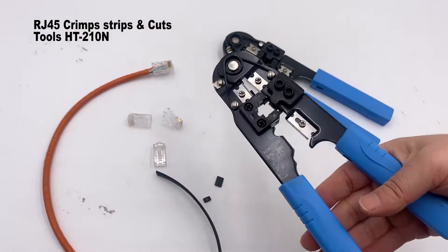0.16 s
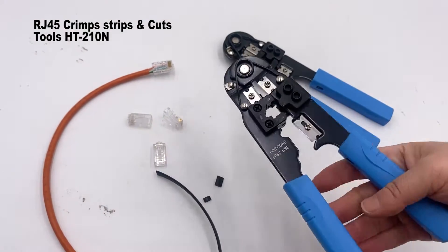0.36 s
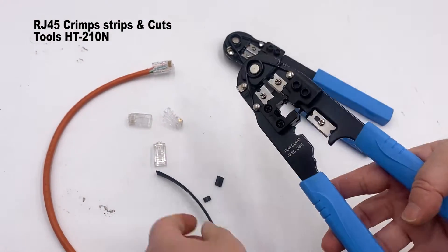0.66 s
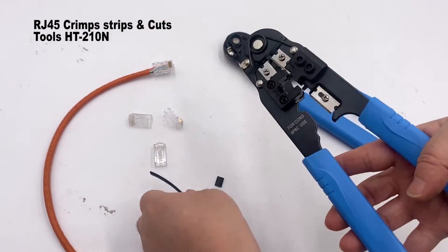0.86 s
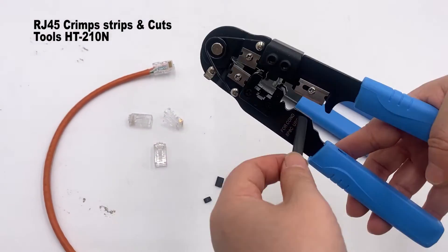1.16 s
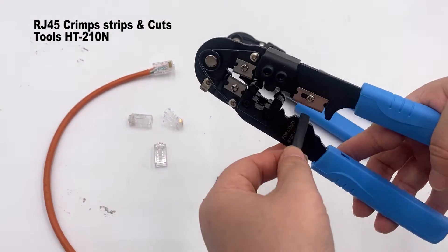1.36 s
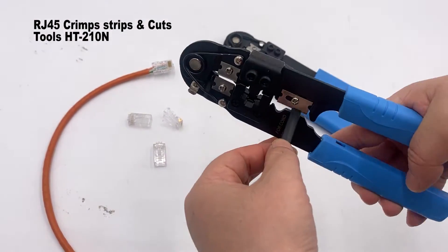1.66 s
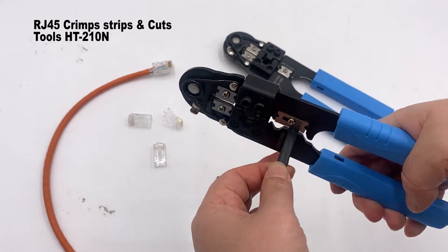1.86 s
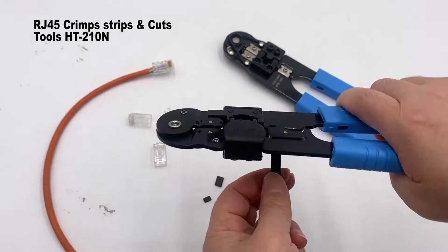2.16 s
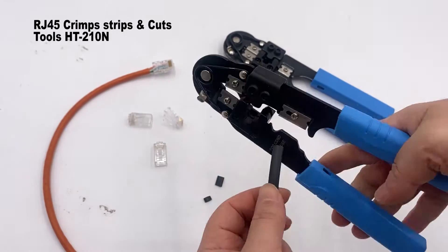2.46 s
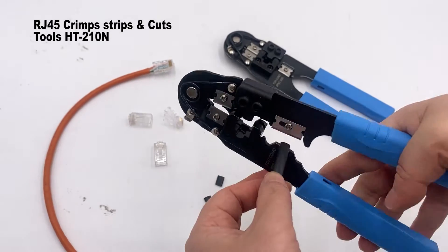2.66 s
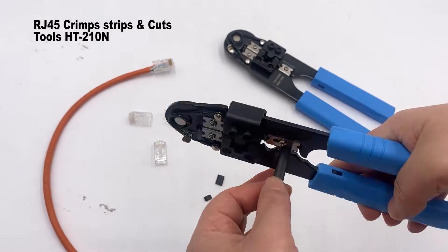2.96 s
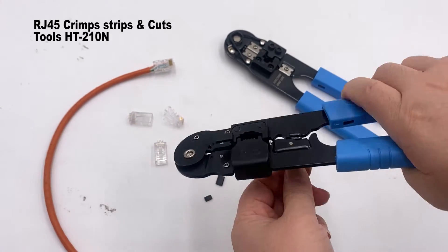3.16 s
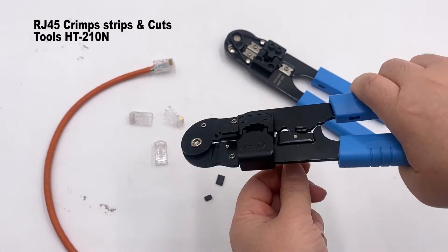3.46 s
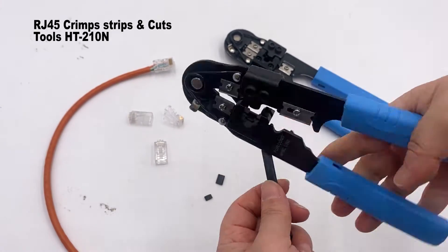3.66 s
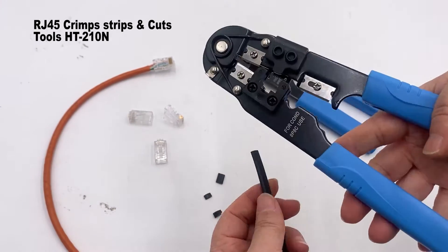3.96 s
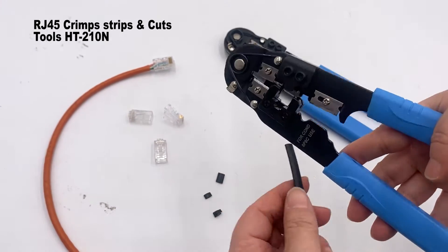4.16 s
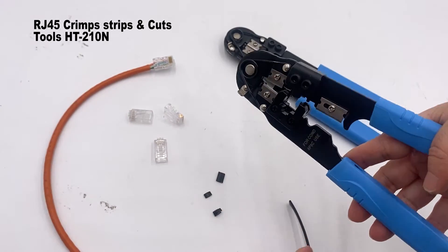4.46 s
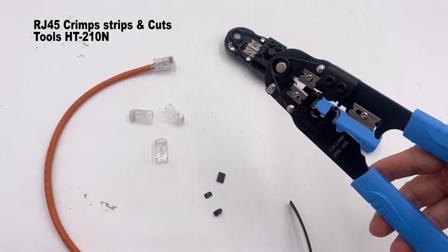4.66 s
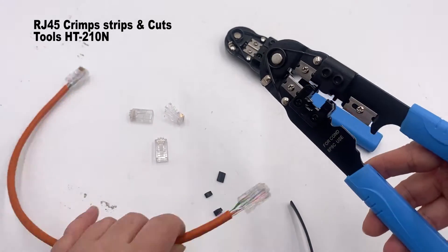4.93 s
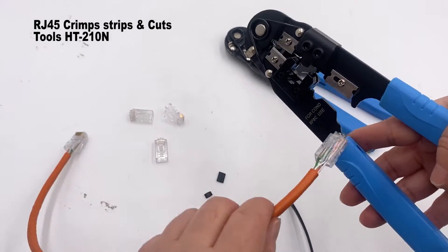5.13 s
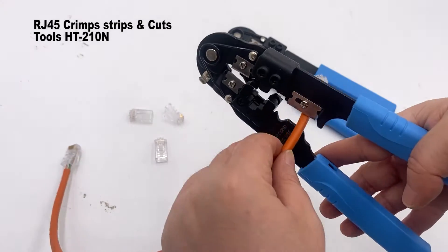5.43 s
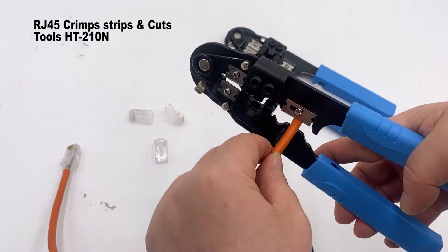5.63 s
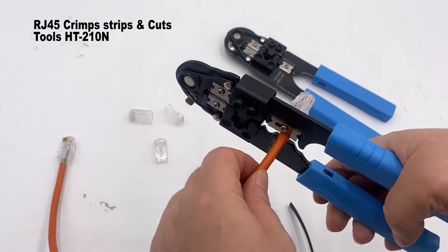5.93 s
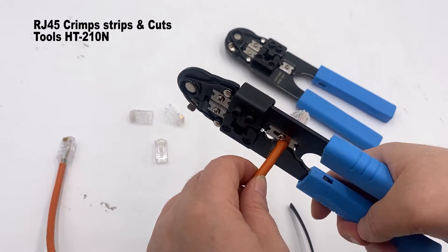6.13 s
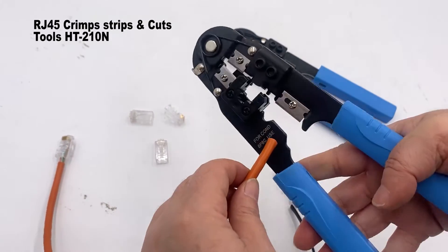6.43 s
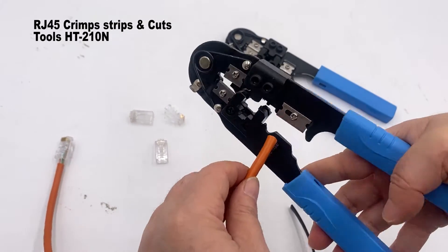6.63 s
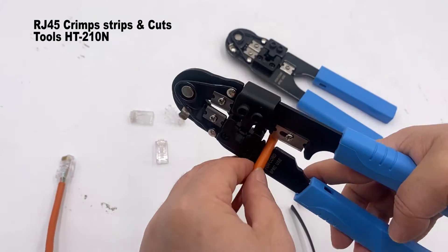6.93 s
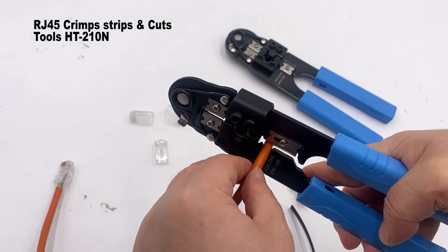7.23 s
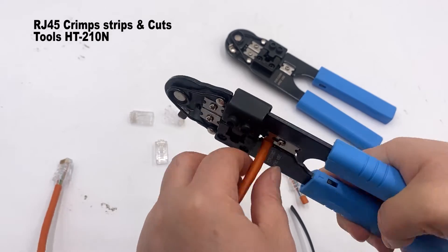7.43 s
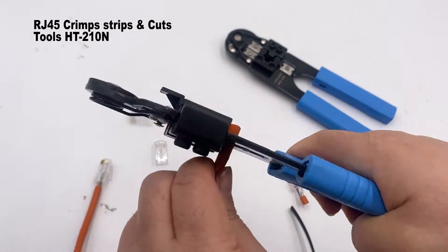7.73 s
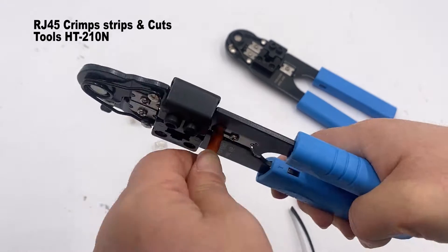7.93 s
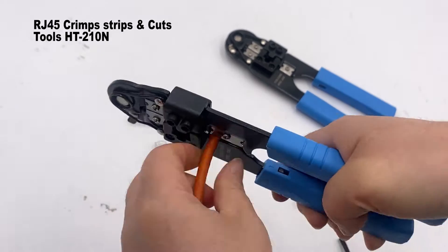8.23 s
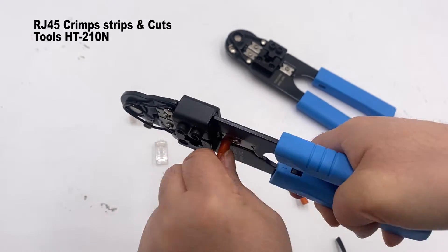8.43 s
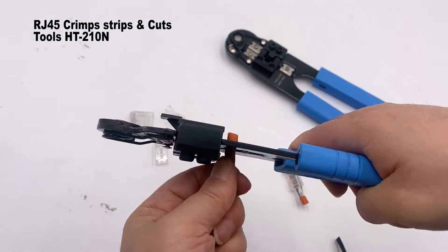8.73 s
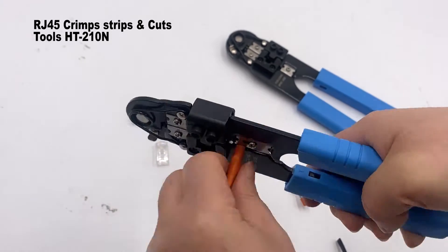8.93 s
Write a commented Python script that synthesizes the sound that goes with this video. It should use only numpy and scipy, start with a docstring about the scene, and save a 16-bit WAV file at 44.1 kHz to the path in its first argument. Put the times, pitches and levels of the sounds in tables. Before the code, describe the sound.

Close to a stereo microphone and slightly right, a steel crimping tool snips through cable three times with sharp snaps. After the second and third cuts its sprung jaws clack open, rattling and ringing briefly. Lighter clicks, soft hand bumps and small scrapes of cable on steel and table fall in between and near the end. A few faint distant knocks and a low appliance hum fill the small room.

```python
"""A steel crimping tool, worked over a table close to a stereo microphone and a little to its right.
Its blade snips through cable three times; its spring throws the jaws open and they rebound off their
stop. Each contact rattles and rings the steel. Cable and fingers slide over steel and table top in tiny
slips, and hand and handles bump softly. Further off in the small room something knocks dully, and an
appliance hums throughout."""
import sys
import numpy as np
from scipy import signal
from scipy.fft import rfft, irfft, next_fast_len
from scipy.io import wavfile
from scipy.ndimage import map_coordinates

SR = 44100
rng = np.random.default_rng(int(sys.argv[2]) if len(sys.argv) > 2 else 0)


def wrap_up_sound(samples):
    """Save the sound to the file named by the first command line argument, as 16-bit audio."""
    columns = np.atleast_2d(samples).T
    # keep every value between -1 and 1, then stretch to whole-number steps
    tamed = np.clip(columns, -1, 1)
    steps = np.round(tamed * 32767).astype(np.int16)
    wavfile.write(sys.argv[1], SR, steps)


N = 400869

# Contacts in the tool. Each row: start in seconds, energy in dB, rattle against the first spike in dB,
# low body in dB.
TOOL_CLICKS = [(.252, -48, 5, -5), (1.0607, -24.5, 5, 13), (1.114, -21.5, 20, 11), (1.1545, -19.5, 7, 3),
               (1.8858, -43, 10, -21), (2.0399, -37.5, 15, -9), (3.9549, -24.5, 1, 8),
               (4.4725, -25.5, 3, -4), (4.4818, -22.5, 8, 3), (4.8336, -19.5, 9, 16),
               (5.024, -11.5, 19, -24), (5.337, -25.5, -5, 2), (5.9072, -27, 10, -19),
               (5.9691, -30, 20, 13), (6.3958, -31, 7, 1), (6.439, -33, 8, 13), (6.5851, -36, 7, 4),
               (6.7445, -39.5, 14, -3), (7.935, -23, 16, 4), (8.0566, -19, 13, -7), (8.279, -13, 20, 2),
               (8.287, -15.5, 13, -2), (8.3248, -11.5, -3.5, -1.5), (8.7685, -44.5, 4, -24),
               (8.804, -40, 9, -23), (8.8856, -33.5, 4, 5), (8.9081, -34, -1, -28),
               (9.061, -11.5, 16.5, -2)]  # jaw, pivot and plug
BLADE_SNIPS = [(2.0818, 7, 13, -2.5), (3.5059, 0, 9, 7), (6.2138, 2, 7, -2.5)]
# The jaws hit their stop. Each row: start in seconds, energy in dB, rattle against the first spike in dB,
# seconds between rebounds, first rebound against the blow in dB.
JAW_OPENINGS = [(3.8375, -3.5, -1.5, 0.03, -12), (4.5067, -9, 4.5, 0.012, -18),
                (6.4649, -0.5, 4.5, .03, -17.5)]
# Knocks across the room. Each row: start in seconds, level in dB, hardness as treble lift in dB.
FAR_KNOCKS = [(.277, -49.5, -2), (.319, -45, 14), (.488, -34.5, 9), (3.281, -48, 3), (3.368, -33, 8.5),
              (3.568, -44, 15)]
# Fingers shift on cable and handles. Each row: start in seconds, end in seconds, relative level in dB.
GRIP_SHIFTS = [(0.796, .87, -69), (1.264, 1.31, -70), (2.479, 2.55, -72.5), (2.741, 2.75, -70),
               (3.738, 3.78, -68), (4.077, 4.1, -72), (4.296, 4.34, -58.5), (4.401, 4.44, -59.5),
               (5.206, 5.26, -59), (5.369, 5.46, -56.5), (5.533, 5.55, -70), (5.632, 5.65, -62.5),
               (5.736, 5.81, -65.5), (5.916, 6.2, -70.5), (6.899, 6.97, -71), (7.48, 7.56, -70.5),
               (7.762, 7.81, -58.5), (7.903, 7.92, -65), (8.241, 8.26, -69)]
# Cable drawn over table or steel. Each row: start in seconds, length in seconds, relative level in dB,
# resonance in Hz, fizz against the body in dB.
CABLE_STROKES = [(.842, 0.036, -52.5, 4900, -1.5), (.897, 0.054, -51, 4360, -4),
                 (.978, 0.066, -51, 5270, 4.5), (1.102, 0.051, -47, 6440, 0.5),
                 (1.177, 0.054, -36.5, 6200, -2.5), (1.222, 0.059, -40, 5700, -1),
                 (2.085, .09, -55, 7600, -5), (2.212, .046, -55.5, 5630, -0.5),
                 (2.617, 0.037, -49, 5740, -10.5), (3.117, .066, -46, 5950, -7),
                 (3.184, 0.085, -55.5, 5200, -7), (4.22, .06, -55.5, 4330, -20),
                 (4.855, .042, -49, 7600, 8.5), (4.923, .082, -29.5, 5730, -8),
                 (4.968, 0.047, -46, 6070, 6), (5.022, 0.11, -32, 7300, -3),
                 (5.121, 0.081, -34.5, 6100, -1.5), (6.472, 0.079, -41, 4750, -11),
                 (7.607, .06, -34, 5440, -2.5), (7.642, .074, -43, 4470, -8),
                 (7.721, 0.043, -42.5, 4540, -15.5), (7.822, 0.048, -48.5, 6540, -6.5),
                 (7.94, .078, -37, 5150, 1.5), (8.002, 0.042, -43.5, 7000, 8), (8.038, 0.13, -37, 5180, -3),
                 (8.463, 0.07, -50, 6500, 0.5)]
# Hand and handles bump. Each row: start in seconds, level in dB, pitch in Hz.
HAND_BUMPS = [(1.061, -45, 162), (3.505, -49.5, 174), (4.506, -41, 234), (4.837, -37.5, 188),
              (6.439, -57.5, 55), (6.466, -40, 179.7), (8.324, -42, 170), (9.061, -41.5, 200)]
# The drift of the appliance's rumble. Each row: time in seconds, relative level in dB.
RUMBLE_DRIFT = [(0, -54.5), (.8, -56.5), (1.8, -54.5), (2.7, -55.5), (3.7, -52.5), (4.6, -59.5), (5.2, -55),
                (5.7, -59), (6.4, -57), (7.3, -59), (9.09, -57.5)]
# Tone colours of the sources. Each row: frequency in Hz, relative level in dB.
AIR_COLOUR = [(100, -22.5), (150, 9), (215, 6), (252, 13.5), (320, -1.5), (390, -1), (520, 2.5), (680, -5),
              (900, -4.5), (1300, -12.5), (2200, -14), (3000, -27), (4200, -24.5), (5500, -35),
              (11000, -39), (13000, -50)]
RUMBLE_COLOUR = [(25, -42.5), (50, -31), (66, -19), (78, -13), (87, -2), (96, 5.5), (106, 2), (135, -8),
                 (165, -11.5), (205, -19), (300, -25), (700, -120)]
JAW_COLOUR = [(100, -18.5), (300, -18.5), (1300, -15.5), (2200, -12), (3400, -9.5), (4600, -1),
              (6300, -7.5), (8500, -10), (12000, -9.5), (16500, -17)]
WOOD_COLOUR = [(100, -34), (330, -14), (490, -3), (650, -11.5), (1000, -12), (2000, -22), (4000, -31),
               (7000, -46), (15000, -54.5)]
SLIDE_COLOUR = [(1500, -42), (3200, -5), (4200, 5.5), (8000, 1.5), (10000, -9), (16000, -6)]
FIZZ_COLOUR = [(1500, -38), (3500, 3), (4800, 1.5), (9000, 8), (13000, 9.5), (16500, -6)]
GRIT_COLOUR = [(200, -22.5), (600, -0.5), (1200, 2.5), (2400, 5.5), (3600, 4.5), (6000, -37.5),
               (12000, -14)]
BLADE_COLOUR = [(100, -46.5), (400, -15), (950, -8.5), (1400, -21.5), (2000, -17), (3000, -24), (4000, -10),
                (6000, -4.5), (7600, -2), (10000, -7), (14000, -13), (16500, -23.5)]
# Resonances. Each row: centre in Hz, width in Hz, relative level in dB.
STEEL_MODES = [(4310, 70, -12), (4840, 270, -9.5), (4970, 45, -5), (5380, 35, -8.5), (6080, 40, 1),
               (6650, 100, -5), (7010, 60, 3.5), (7440, 45, 2.5), (7500, 50, -6), (7710, 70, 1.5),
               (8150, 130, -2.5), (8560, 55, 4.5), (9200, 37, 3), (9900, 70, 0), (10550, 70, -3),
               (12300, 180, -6.5), (14000, 80, 0)]  # the tool
SPRING_MODES = [(4580, 35, -2.5), (4900, 38, -2)]  # its long-ringing jaw spring
PANEL_MODES = [(535, 44, -3), (780, 12, -11), (1200, 9.3, -29), (1262, 16, 2), (1470, 20, -7.5),
               (2300, 15, 3)]  # the knocked object
# The small room's decay. Each row: frequency in Hz, seconds to fall by 60 dB.
ROOM_T60 = [(200, 0.14), (1000, 0.55), (2500, .38), (4500, 0.25), (8000, 0.16), (15000, 0.16)]
# Likeness of left and right at the microphone. Each row: frequency in Hz, correlation.
STEREO_LIKENESS = [(100, .99), (250, 0.95), (500, 0.88), (1000, 0.25), (2500, 0.3), (4600, 0.54),
                   (9000, .55), (14000, .62)]
# The tool's sound arrives from the right. Each row: frequency in Hz, lead of the left port in radians.
LEFT_LEAD = [(300, 0), (1200, -1), (2400, -2), (3300, -5), (4500, -6), (6000, -7), (8500, -6),
             (10500, -7.6), (13000, -6.5), (15000, -5.5)]
# The recorder's case shades one port. Each row: frequency in Hz, left over right in dB.
CASE_SHADE = [(400, -0.2), (1700, -5), (2600, -4), (3800, 1), (4900, 0.5), (6000, -3), (11000, -3),
              (15000, 1)]


def amp(db):
    """Decibels to gain."""
    return 10 ** (np.asarray(db) / 20)


def unit(x):
    """Scaled to rms 1."""
    return x / np.sqrt(np.mean(x ** 2) + 1e-20)


def unit_energy(x):
    """Scaled to a mean energy of 1 per channel."""
    return unit(x) / np.sqrt(x.shape[-1])


def along(points, hz):
    """(Hz, value) points joined on a log frequency axis."""
    freqs, values = np.transpose(points)
    return np.interp(np.log(hz + 1), np.log(freqs), values)


def wobble(rate, size):
    """A smooth random curve, rate knots a second."""
    knots = rng.standard_normal(int(size * rate / SR) + 4)
    return map_coordinates(knots, [np.arange(size) * rate / SR])


def filtered(x, response):
    """x through a filter whose gain is response(Hz)."""
    size = x.shape[-1]
    padded = next_fast_len(size + 4096)
    return irfft(rfft(x, padded) * response(np.fft.rfftfreq(padded, 1 / SR)), padded)[..., :size]


def coloured(x, colour):
    """x shaped by a tone colour."""
    return filtered(x, lambda hz: amp(along(colour, hz)))


def ringing(x, modes, ring_db):
    """x plus the resonances it excites."""
    def resonances(hz):
        return sum(amp(db) * 1j * hz * width / (centre ** 2 - hz ** 2 + 1j * hz * width)
                   for centre, width, db in modes)
    return filtered(x, lambda hz: 1 + amp(ring_db) * resonances(hz))


def peak(hz, centre_hz, q):
    """Response of one resonance of sharpness q."""
    return 1 / (1 + 1j * q * (hz / centre_hz - centre_hz / (hz + 1)))


def noise(size):
    """White stereo noise, alike in the bass and partly unrelated above."""
    def mid_and_side(hz):
        angle = np.arccos(np.clip(along(STEREO_LIKENESS, hz), -1, 1)) / 2
        return np.array([np.cos(angle), np.sin(angle)])
    mid, side = filtered(rng.standard_normal((2, size)), mid_and_side)
    return np.array([mid + side, mid - side])


def appliance(air_db=-56, hum_db=-57, hum_hz=201.1):
    """Room tone from an appliance: airy noise, a rumble held by the room's low modes, an unsteady hum."""
    t = np.arange(N) / SR
    air = unit(coloured(noise(N), AIR_COLOUR))
    rumble_db = np.interp(t, *np.transpose(RUMBLE_DRIFT)) + 1
    rumble = unit(coloured(noise(N), RUMBLE_COLOUR))
    phase = 2 * np.pi * hum_hz * t + .1 * wobble(2.2, N)
    hum = unit(np.sin(phase) * amp(0.65 * wobble(2, N)))
    lean_left = amp([[.25], [-.25]])
    return amp(air_db) * air + lean_left * (amp(rumble_db) * rumble + amp(hum_db) * hum)


def struck(force, colour, body_db, size=2048):
    """A struck part answers a force in its own colour, shifted by body_db below about 3 kHz."""
    hz = np.fft.rfftfreq(size, 1 / SR)
    gain_db = along(colour, hz) + body_db / (1 + (hz / 3000) ** 4)
    cepstrum = irfft(np.log(amp(gain_db)))
    cepstrum[1:size // 2] *= 2  # minimum phase: nothing sounds before the blow
    cepstrum[size // 2 + 1:] = 0
    impulse = unit_energy(irfft(np.exp(rfft(cepstrum))))
    return signal.fftconvolve(force, impulse[None], axes=1)[:, :force.shape[1]]


def contacts(rows, colour, modes, rattle_t60, ring_db, crack_db, crack_t60=0.011):
    """Each contact is a spike, a brief crack and a dense rattle of loose steel; all ring the tool."""
    out, t = np.zeros((2, N)), np.arange(SR // 5) / SR
    for start, db, rattle_db, body_db in rows:
        crack = noise(len(t)) * amp(-60 * t / crack_t60)
        rattle = noise(len(t)) * amp(-60 * t / rattle_t60 + 0.84 * wobble(900, len(t)))
        force = (t == 0) + amp(crack_db) * unit_energy(crack) + amp(rattle_db) * unit_energy(rattle)
        hit = ringing(struck(force, colour, body_db), modes, ring_db)
        add(out, start, amp(db) * unit_energy(hit))
    return out


def jaw_clicks(rows):
    """Jaw, pivot and plug make contact, ringing the steel and the spring."""
    return contacts(rows, JAW_COLOUR, STEEL_MODES + SPRING_MODES,
                    rattle_t60=0.075, ring_db=0, crack_db=1.5)


def knocks(rise_s=0.015, tail_db=-10, tail_t60=0.55, boom_db=-2, boom_hz=480, lag_s=0.00025):
    """Across the room, to the right: a short hollow boom in a swell of reflections with a long tail."""
    out, t = np.zeros((2, N)), np.arange(SR // 2) / SR
    swell = t / rise_s * np.exp(1 - t / rise_s)
    tail = amp(tail_db - 60 * t / tail_t60) * (1 - np.exp(-t / rise_s))
    for start, db, hard_db in FAR_KNOCKS:
        wood = filtered(noise(len(t)),
                        lambda hz: amp(along(WOOD_COLOUR, hz) + hard_db * hz ** 2 / (hz ** 2 + 800 ** 2)))
        panel = unit(ringing(wood, PANEL_MODES, ring_db=3))
        boom = amp(boom_db) * swell ** 2 * np.sin(2 * np.pi * boom_hz * t + 0.62 * wobble(83, len(t)))
        add(out, start, amp(db) * (np.hypot(swell, tail) * panel + boom))
    delay_s = np.array([[.5], [-.5]]) * lag_s  # lows and mids reach the left port later
    return filtered(out, lambda hz: np.exp(-2j * np.pi * hz * delay_s / (1 + (hz / 3000) ** 4)))


def shifting(x, depth_db, span_hz=300, life_s=.008):
    """Narrow resonances come and go as the contact point travels."""
    spectra = signal.stft(x, nperseg=256)[2]
    steps = np.array([SR / 256 / span_hz, 128 / SR / life_s])
    grid = np.mgrid[:spectra.shape[1], :spectra.shape[2]] * steps[:, None, None]
    knots = rng.standard_normal(grid[:, -1, -1].astype(int) + 2)
    gain = amp(depth_db * map_coordinates(knots, grid))
    return signal.istft(spectra * gain, nperseg=256)[1][:, :x.shape[1]]


def rubs(rows, q, grain_db, judder_db, grit_db, ring_db, trim_db=-3.5, grit_ceiling_db=-56.5):
    """In each stroke tiny slips excite a broad resonance, fizz above, grit below, and ring the steel."""
    out, t = np.zeros((2, N)), np.arange(-SR // 10, SR // 10) / SR
    for start, length, db, centre_hz, fizz_db in rows:
        grip = amp(grain_db * wobble(1500, len(t)) + judder_db * wobble(130, len(t)))
        squeaks = shifting(grip * noise(len(t)), depth_db=4.4)
        body = filtered(squeaks, lambda hz: amp(along(SLIDE_COLOUR, hz)) * peak(hz, centre_hz, q))
        fizz = coloured(shifting(grip * noise(len(t)), depth_db=5), FIZZ_COLOUR)
        grit = coloured(squeaks, GRIT_COLOUR)
        half_strength_s = .58 * length / 2  # either side of the stroke's middle
        swell = .5 ** (np.abs(t / half_strength_s) ** 2.04)
        slide = amp(db + trim_db) * (unit(swell * body) + amp(fizz_db) * unit(swell * fizz))
        grit_gain = 1 / np.hypot(amp(-db - grit_db), amp(-grit_ceiling_db))  # levels off in loud strokes
        rasp = grit_gain * unit(swell ** .6 * grit)
        add(out, start + length / 2 + t[0], np.sqrt(np.mean(swell ** 2)) * (slide + rasp))
    return ringing(out, STEEL_MODES, ring_db)


def finger_creep(step_s=.035, length_s=0.085, centre_hz=4900, fizz_db=-2.5):
    """As the grip shifts, skin slips in faint overlapping strokes, each of its own strength and pitch."""
    slips = []
    for start, end, db in GRIP_SHIFTS:
        for middle in np.arange(start, end, step_s):
            slip_db = db + 1.4 * rng.standard_normal()
            slip_hz = centre_hz * 2 ** (0.18 * rng.standard_normal())
            slips.append((middle - length_s / 2, length_s, slip_db, slip_hz, fizz_db))
    return rubs(slips, q=2.3, grain_db=0.4, judder_db=5, grit_db=-0.5, ring_db=2.5)


def cable_slides():
    """Cable rubs over table top and steel."""
    return rubs(CABLE_STROKES, q=4, grain_db=1.6, judder_db=1.5, grit_db=-5, ring_db=2)


def hand_bumps(t60=0.14, attack_s=0.00067):
    """Hand and handles give a soft push through one low, well damped resonance."""
    out, t = np.zeros((2, N)), np.arange(SR // 4) / SR
    for start, db, pitch_hz in HAND_BUMPS:
        thud = filtered(noise(len(t)), lambda hz: peak(hz, pitch_hz, q=0.92) ** 2)
        envelope = amp(db - 60 * t / t60) * (1 - np.exp(-t / attack_s))
        add(out, start, envelope * unit(thud))
    return out


def blade_snips():
    """The blade bites through the cable and jolts the steel."""
    return contacts(BLADE_SNIPS, BLADE_COLOUR, STEEL_MODES, rattle_t60=0.05, ring_db=-6.5, crack_db=-2)


def jaw_openings(rebounds=2, body_db=0.5, rebound_rattle_db=8, loss_db=1):
    """Contact rows for the sprung jaws: one blow on the stop, then evenly spaced, weaker rebounds."""
    rows = []
    for start, db, rattle_db, period, rebound_db in JAW_OPENINGS:
        rows.append((start, db, rattle_db, body_db))
        for k in range(rebounds):
            bounce_db = db + rebound_db - k * loss_db
            rows.append((start + (k + 1) * period, bounce_db, rebound_rattle_db, body_db))
    return rows


def add(track, start, sound):
    """Mix a sound in at a start in seconds."""
    first = max(round(start * SR), 0)
    part = track[:, first:first + sound.shape[1]]
    part += sound[:, :part.shape[1]]


def microphone_ports(x):
    """Close sounds reach the two microphone ports with different delay and level."""
    split = np.array([[.5], [-.5]])
    return filtered(x, lambda hz: np.exp(1j * split * along(LEFT_LEAD, hz))
                    * amp(split * along(CASE_SHADE, hz)))


def room(x, delay_s=0.0088):
    """The near walls answer; each frequency dies at its own speed."""
    hz, t, spectra = signal.stft(noise(SR // 2), SR, nperseg=256)
    decay = amp(-60 * t / along(ROOM_T60, hz)[:, None])
    tail = signal.istft(spectra * decay, SR, nperseg=256)[1]
    tail = np.pad(unit_energy(tail), ((0, 0), (round(delay_s * SR), 0)))
    return signal.fftconvolve(x, tail, axes=1)[:, :N]


def scene(room_db=-20.5):
    """Tool and hands close to the microphone, the small room behind them."""
    tool = blade_snips() + jaw_clicks(jaw_openings() + TOOL_CLICKS)
    close = microphone_ports(tool + cable_slides() + finger_creep()) + hand_bumps()
    return close + amp(room_db) * room(close) + knocks() + appliance()


def record(dry, top_hz=16100):
    """The recorder cuts off steeply above its band limit."""
    return filtered(dry, lambda hz: 1 / np.sqrt(1 + (hz / top_hz) ** 160))


dry = scene()
out = record(dry)
wrap_up_sound(out)
```